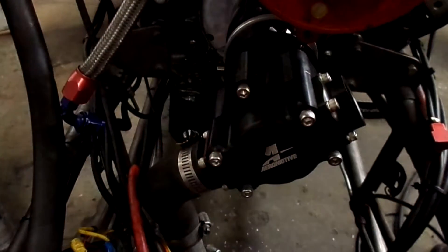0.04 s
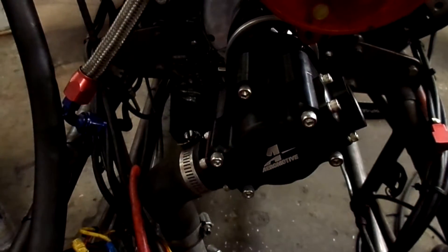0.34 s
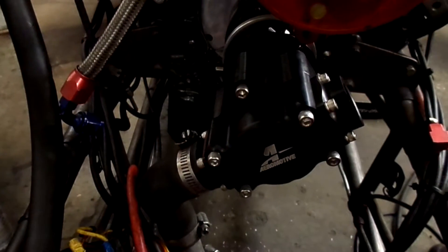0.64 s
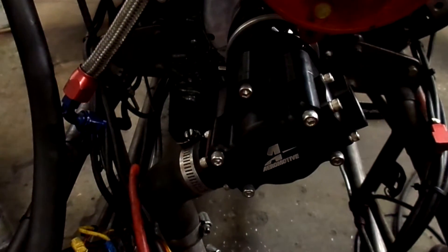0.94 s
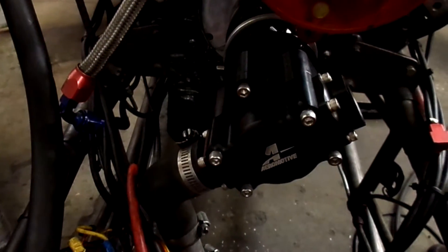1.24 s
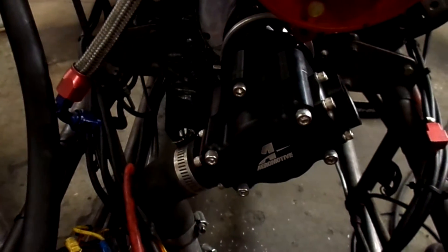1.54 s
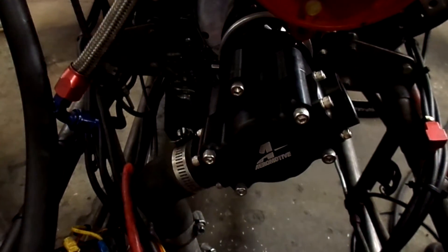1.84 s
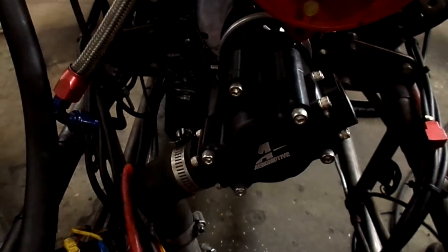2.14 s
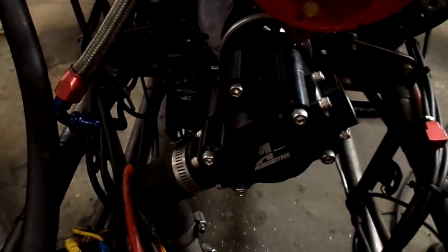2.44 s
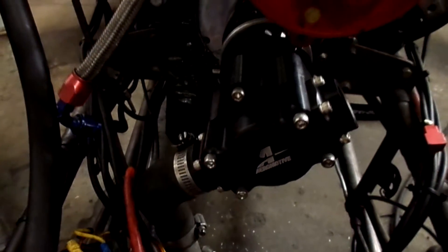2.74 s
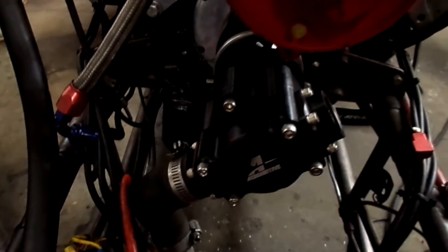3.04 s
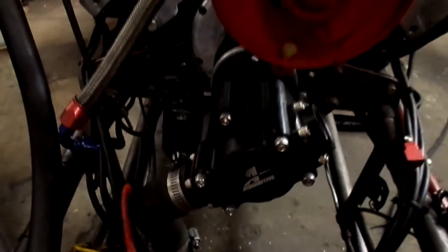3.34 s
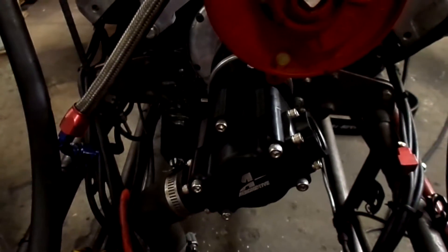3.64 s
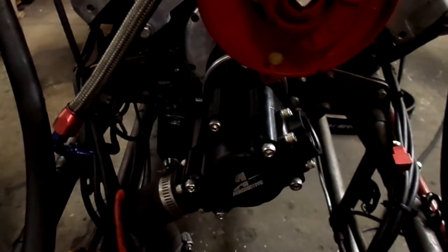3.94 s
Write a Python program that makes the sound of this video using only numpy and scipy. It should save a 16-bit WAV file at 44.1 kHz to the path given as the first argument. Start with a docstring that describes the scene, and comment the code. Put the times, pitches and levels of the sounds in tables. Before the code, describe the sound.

High, whirring cricket chirps pulse steadily, picked up by one microphone in a garage. Midway come two metallic knocks with a brief rattle. A far engine drone and a soft hiss grow louder, then ease as the chirping fades.

```python
"""A high whirr, most likely a cricket, pulses seven times a second in a bare garage: three quick
wing strokes a chirp, smeared by the walls. A distant engine drones over low rumble and a very
faint, thin electrical whine. About halfway, something metal knocks twice and rattles, then a soft
hiss swells and fades. One microphone hears it all."""
import sys
import numpy as np
from scipy import signal
from scipy.fft import rfft, irfft
from scipy.io import wavfile

SR = 44100
rng = np.random.default_rng(int(sys.argv[2]) if len(sys.argv) > 2 else 0)


def generate_wav(sig):
    """Save sig (samples, or channels by samples) to the path in sys.argv[1] as 16-bit PCM at SR."""
    pcm = np.round(np.clip(np.atleast_2d(sig).T, -1, 1) * 32767).astype(np.int16)
    wavfile.write(sys.argv[1], SR, pcm)


N = 176400
T = np.arange(N) / SR


def from_db(db):
    """Decibels to gain."""
    return 10 ** (np.asarray(db) / 20)


def unit_rms(x):
    """Scale to unit rms."""
    return x / np.sqrt(np.mean(x ** 2) + 1e-20)


def in_time(rows):
    """Join (time_s, value) points by straight lines."""
    return np.interp(T, *np.transpose(rows))


def at_hz(points, hz):
    """Read (freq_hz, value) points on a log-frequency axis."""
    freqs, values = np.transpose(points)
    return np.interp(np.log(np.maximum(hz, 1)), np.log(freqs), values)


def noise(spectrum, tilt_db=0):
    """Coloured noise of unit rms, then tilted per octave about 1 kHz."""
    hz = np.maximum(np.arange(N // 2 + 1) * SR / N, 1)
    gain = unit_rms(from_db(at_hz(spectrum, hz)))
    octaves = np.log2(np.maximum(hz, 150) / 1000)
    return irfft(rfft(rng.standard_normal(N)) * gain * from_db(tilt_db * octaves), N)


def drift(rate_hz):
    """Random wander of unit rms, mostly slower than rate_hz."""
    hz = np.arange(N // 2 + 1) * SR / N
    return unit_rms(irfft(rfft(rng.standard_normal(N)) / (1 + (hz / rate_hz) ** 2), N))


def decay(t60_s):
    """Exponential fall of 60 dB in t60_s."""
    return np.exp(-np.log(1000) * T / t60_s)


def add(out, sound, start_s):
    """Mix a sound in at a time."""
    i = max(int(start_s * SR), 0)
    out[i:i + len(sound)] += sound[:max(len(out) - i, 0)]


def cricket():
    """Each wing stroke is a short falling tone over the faint scrape of the wing's file."""
    # chirps, timed at their last stroke: time_s
    chirps = [.097, .227, .359, .499, .634, .772, .916, 1.064, 1.203, 1.345, 1.477, 1.62, 1.758, 1.897,
              2.042, 2.181, 2.32, 2.459, 2.595, 2.729, 2.869, 3.009, 3.15, 3.288, 3.426, 3.565, 3.7, 3.84,
              3.978]
    # chirp loudness ahead of the walls: time_s, level_db
    chirp_level = [(0, -29.5), (1.1, -30), (2.2, -29), (3.0, -29), (3.4, -33.5), (3.9, -39)]
    # strokes of one chirp: lead_s, relative_db, length_s
    strokes = [(.041, -7, .005), (.022, -2.5, .006), (0.00041, -1.5, .006)]
    # partials of the wing: multiple, relative_db
    partials = [(1, 0), (2, -23)]
    # spectrum of the scrape: freq_hz, relative_db
    rasp_spectrum = [(4000, -25), (6000, -2), (7200, 6), (8400, 8), (9000, -12), (9500, -2), (10200, -12),
                     (11100, 0), (12500, -14), (14400, -6), (15500, -15)]
    wing_hz, fall_hz, roughness = 7120, 1180, .12
    rasp_db, jitter_s = -20, .0003
    out, rasp = np.zeros(N), noise(rasp_spectrum)
    for chirp_s in chirps:
        for lead_s, db, length_s in strokes:
            sweep = np.linspace(-.5, .5, int(length_s * SR))
            gain = from_db(db + rng.normal())
            start_s = chirp_s - lead_s - length_s / 2 + rng.normal(0, jitter_s)
            wobble = np.interp(sweep, np.linspace(-.5, .5, 10), rng.normal(0, roughness, 10))
            phase = 2 * np.pi * np.cumsum(wing_hz + fall_hz * (wobble - sweep)) / SR
            tone = sum(from_db(partial_db) * np.sin(k * phase) for k, partial_db in partials)
            scrape = from_db(rasp_db) * rasp[rng.integers(N // 2):][:len(sweep)]
            envelope = np.cos(np.pi * sweep) ** 2
            add(out, gain * envelope * (tone + scrape), start_s)
    return out * from_db(in_time(chirp_level))


def bare_walls(chirps):
    """The chirps reach the microphone directly, as early echoes and as a diffuse tail."""
    # early reflections: delay_s, relative_db
    echoes = [(.0037, -5.5), (0.016, -0.5), (.033, -17), (.038, -22.5)]
    tail_db = 5.5
    response = from_db(tail_db) * unit_rms(rng.standard_normal(N) * decay(t60_s=.55)) / np.sqrt(N)
    response[0] += 1  # direct path
    for delay_s, db in echoes:
        response[int(delay_s * SR)] += from_db(db)
    return signal.fftconvolve(chirps, response)[:N]


def distant_engine():
    """Only a few low orders carry this far; they swell and sag as the engine slows."""
    # the third and strongest order: time_s, pitch_hz
    pitch = [(0, 129), (.6, 127), (1.05, 128.5), (1.3, 125), (1.75, 129), (2.15, 130.5), (2.5, 124.5),
             (2.8, 126), (3.1, 121), (3.3, 119.5), (3.7, 117.5), (4, 116.5)]
    # swells of the drone: time_s, level_db
    level = [(0.0, -44), (0.2, -38.5), (0.27, -48), (0.34, -34.5), (0.54, -45.5), (1.0, -34.5),
             (1.55, -38.5), (1.79, -29), (1.95, -44), (1.99, -32), (2.19, -24.5), (2.31, -42), (2.43, -27),
             (2.56, -37.5), (2.67, -25.5), (2.71, -34), (2.84, -23), (2.97, -30.5), (3.04, -21.5),
             (3.11, -30), (3.2, -16), (3.27, -24), (3.48, -19.5), (3.62, -23), (3.69, -19), (4.0, -31.5)]
    # engine harmonics: order, relative_db
    orders = [(2, -20), (3, 0.5), (5, -27.5), (6, -26)]
    waver_hz, flutter_db = 1.19, 1.7
    fundamental_hz = (in_time(pitch) + waver_hz * drift(rate_hz=5.7)) / 3
    phase = 2 * np.pi * np.cumsum(fundamental_hz) / SR
    drone = sum(from_db(db + flutter_db * drift(rate_hz=8.6)) * np.sin(k * phase) for k, db in orders)
    return np.sqrt(2) * from_db(in_time(level)) * drone


def rumble():
    """Low background noise, nearly steady, easing at the end."""
    # colour of the rumble: freq_hz, relative_db
    spectrum = [(20, 1.5), (40, -2), (80, 4), (125, -3.5), (220, -5.5), (350, -10.5), (550, -10),
                (950, -12), (1500, -15), (2300, -22.5), (3500, -31.5), (5500, -38.5), (9000, -37.5),
                (15000, -46)]
    # loudness at the microphone: time_s, level_db
    level = [(0, -37.5), (2.1, -36.5), (3.1, -35), (3.5, -38), (4, -41.5)]
    return from_db(in_time(level)) * noise(spectrum)


def electrical_whine(pitch_hz=15735, level_db=-72):
    """One thin, steady tone near the top of hearing."""
    return from_db(level_db) * np.sqrt(2) * np.sin(2 * np.pi * pitch_hz * T)


def metal_knocks():
    """Each blow gives a broad crack and rings the metal's modes."""
    # knocks and rattles: start_s, body_db, crack_db, tilt_db_per_octave
    blows = [(2.1796, -18, -1, 0), (2.1885, -20, -5.5, 1), (2.2595, -38, -19.5, 4.5), (2.280, -50, -25, 3),
             (2.3303, -30.5, -3, 0.5), (2.357, -29, -9, -7.5), (2.399, -40, -19, 1),
             (2.451, -41, -16, -3.5)]
    # modes of the metal: pitch_hz, relative_db, t60_s
    modes = [(200, -1.5, .4), (490, 0, .25), (641, -3, 0.26), (850, 3.5, .12), (936, -1.5, 0.21),
             (1038, -3, 0.18), (1342, 0.5, 0.36), (1454, 3, 0.13), (1735, -1, .14), (1868, -2, 0.22),
             (2120, -11, 0.18), (2218, -25, .17), (2396, -12, 0.15), (2761, -7.5, 0.11)]
    # spectrum of the crack: freq_hz, relative_db
    crack_spectrum = [(70, -20.5), (200, -2.5), (450, 0.5), (900, -1.5), (1600, -7.5), (2800, -8),
                      (4000, -18), (5500, -21.5), (8000, -27), (11000, -25), (15000, -45)]
    ring_gain, crack_trim_db, scatter_db = .5, -15, 1.6
    out = np.zeros(N)
    for start_s, body_db, crack_db, tilt_db in blows:
        ring = np.zeros(SR)
        for hz, db, t60_s in modes:
            gain = from_db(db + rng.normal(0, scatter_db)) * rng.choice([-1, 1])
            ring += gain * np.sin(2 * np.pi * hz * T[:SR]) * decay(t60_s)[:SR]
        crack = noise(crack_spectrum, tilt_db) * decay(t60_s=.092)
        add(out, ring_gain * from_db(body_db) * ring, start_s)
        add(out, from_db(crack_trim_db + crack_db) * crack, start_s)
    return out


def garage_reverb(sound, tail_db=-2):
    """The garage adds a diffuse tail in which the low octaves linger longest."""
    # reverberation of the garage: freq_hz, t60_s
    decay_times = [(150, 1.1), (600, 0.87), (1500, 0.64), (3000, 0.5), (7000, .45), (14000, 0.32)]
    tail = np.zeros(N)
    for low_hz in 80 * 2. ** np.arange(8):
        octave = signal.butter(2, [low_hz, min(2 * low_hz, .45 * SR)], "band", fs=SR, output="sos")
        t60_s = at_hz(decay_times, low_hz * np.sqrt(2))
        tail += signal.sosfilt(octave, rng.standard_normal(N)) * decay(t60_s)
    response = unit_rms(tail) / np.sqrt(N)  # unit energy
    return sound + from_db(tail_db) * signal.fftconvolve(sound, response)[:N]


def hiss():
    """Soft, broad noise that swells around the knocks, peaks after them and fades."""
    # colour of the hiss: freq_hz, relative_db
    spectrum = [(150, 7.5), (400, 3), (620, -1), (820, 7.5), (1050, -4), (1400, -3), (2500, -12.5),
                (4000, -16.5), (5000, -13.5), (6200, -16.5), (9400, -14), (10000, -13), (10500, -11.5),
                (12000, -19.5), (13500, -20), (15500, -28)]
    # loudness at the microphone: time_s, level_db
    level = [(0, -77), (1.7, -62), (2.3, -41.5), (2.6, -40), (2.9, -38), (3.1, -35.5), (3.45, -42.5),
             (4, -51)]
    return from_db(in_time(level)) * noise(spectrum)


def scene():
    """Everything at one microphone in the garage."""
    chirps = bare_walls(cricket())
    knocks = garage_reverb(metal_knocks())
    return (chirps + distant_engine() + rumble() + electrical_whine() + knocks + hiss())[None]


def record(dry):
    """A steep low-pass cuts the top just above the whine."""
    cutoff_hz = 15900
    return signal.sosfilt(signal.ellip(12, .1, 80, cutoff_hz, fs=SR, output="sos"), dry)


dry = scene()
out = record(dry)
generate_wav(out)
```